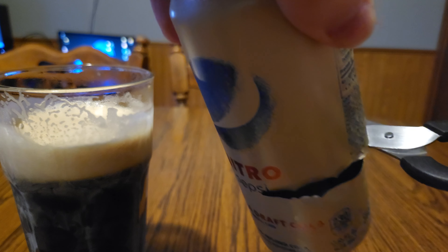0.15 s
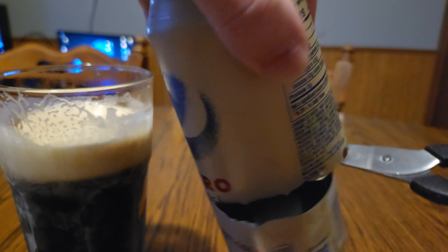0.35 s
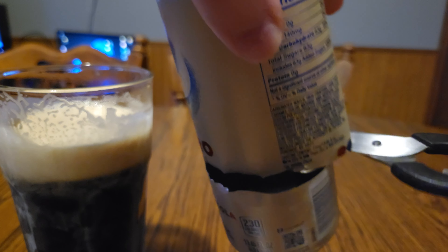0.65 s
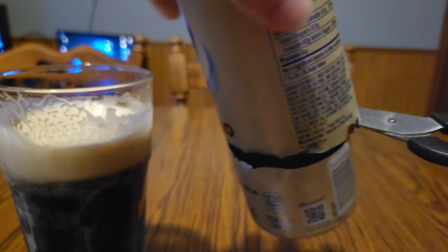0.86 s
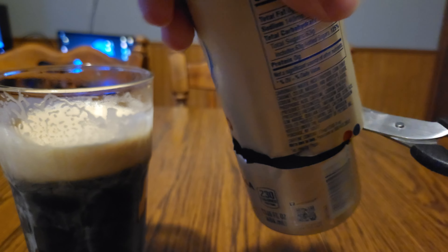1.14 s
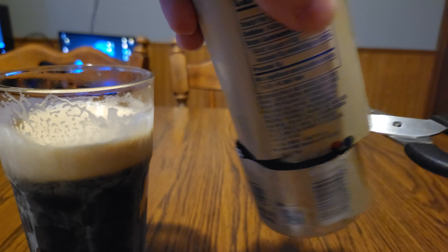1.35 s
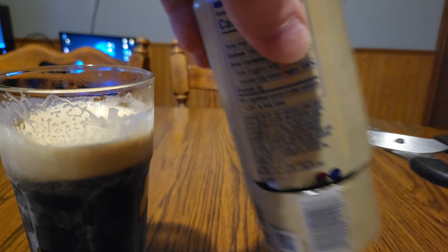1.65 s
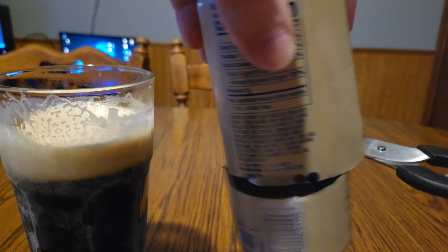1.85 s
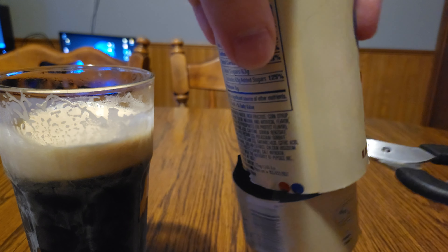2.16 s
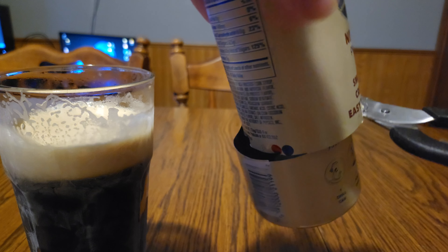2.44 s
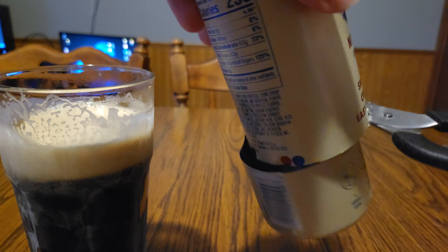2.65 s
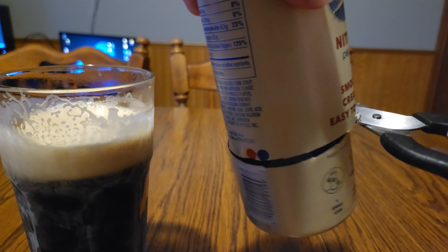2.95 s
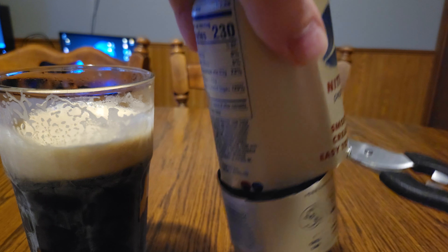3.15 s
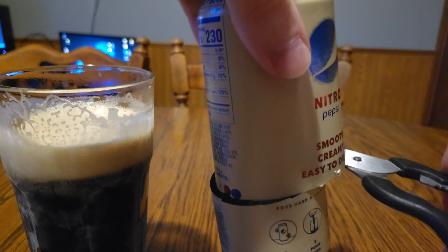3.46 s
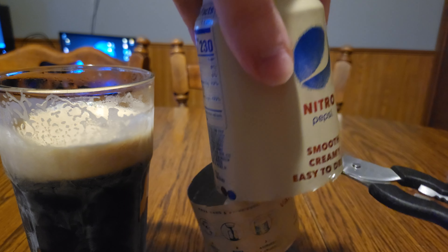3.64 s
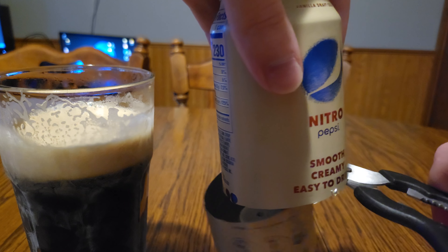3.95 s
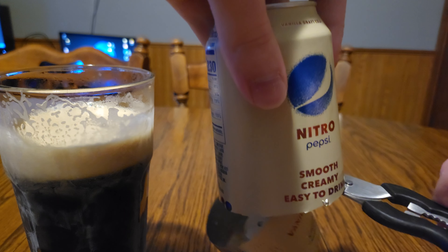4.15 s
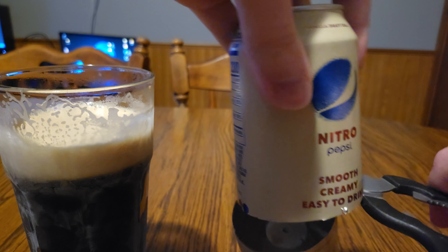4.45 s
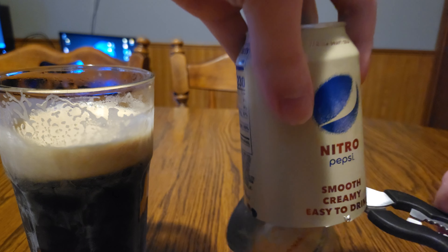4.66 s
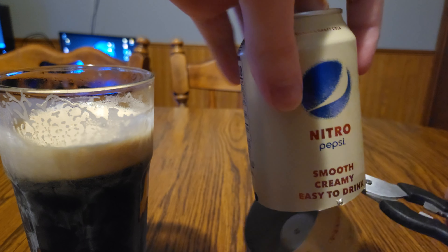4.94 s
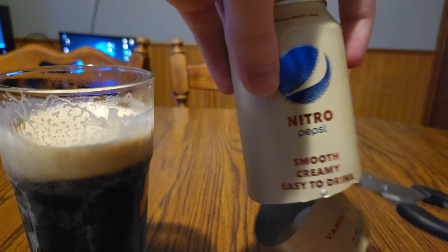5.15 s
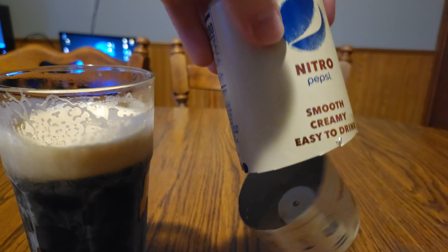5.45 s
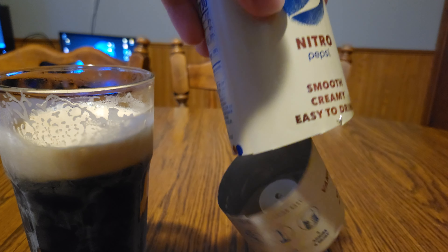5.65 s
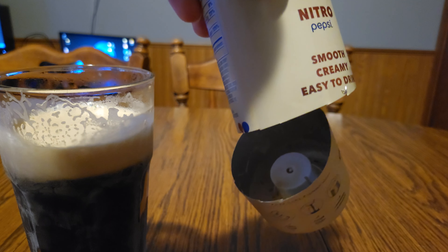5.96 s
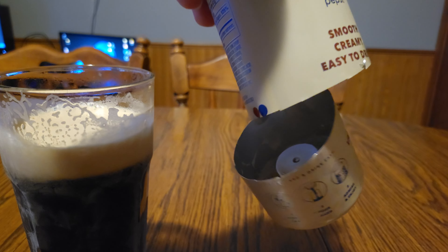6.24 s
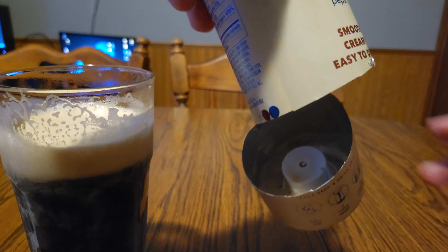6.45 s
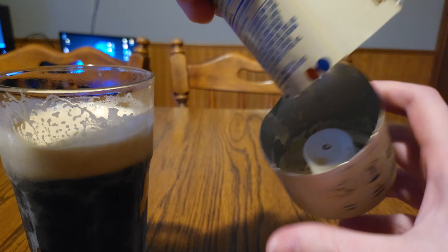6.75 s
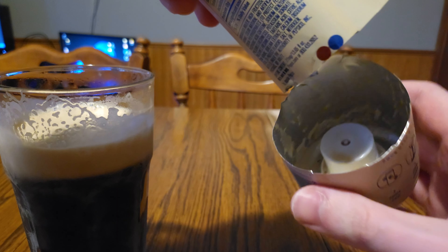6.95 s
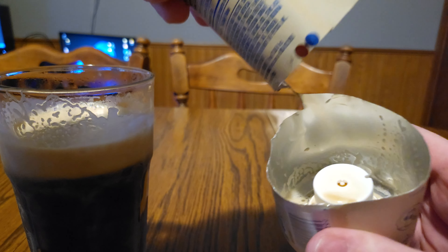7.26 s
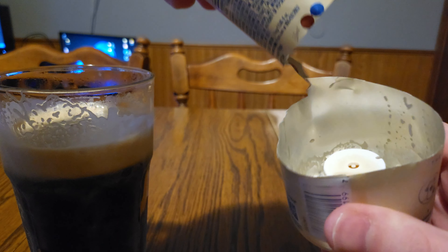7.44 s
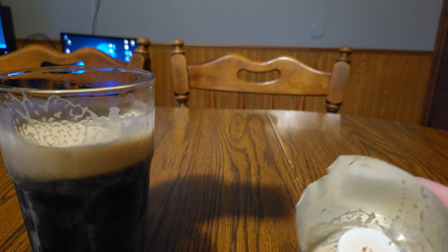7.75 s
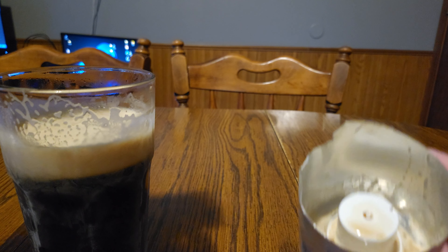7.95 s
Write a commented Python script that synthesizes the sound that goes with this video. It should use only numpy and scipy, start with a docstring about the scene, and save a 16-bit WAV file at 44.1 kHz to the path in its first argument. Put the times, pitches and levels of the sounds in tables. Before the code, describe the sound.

Close, dry metallic crunching and sharp tinny snaps of a drink can being cut, then a rattling knock on a table and a short ring.

```python
"""A small room, close to a wooden table: scissors work round a thin aluminium drink can held above it.
Noise bursts through resonances make the shearing crinkle and sharp snaps; the wall's note mostly rises.
Slip pulses make the creaks. The bottom drops on the table and rattles as struck modes over knocks,
hangs by a last strip, then is twisted off and rings as decaying sines.
Two microphone ports on one case hear it with a diffuse room tail, quiet air and a low hum."""
import sys
import numpy as np
from scipy import signal
from scipy.fft import rfft, irfft, next_fast_len
from scipy.io import wavfile
from scipy.ndimage import map_coordinates

SR = 44100
rng = np.random.default_rng(int(sys.argv[2]) if len(sys.argv) > 2 else 0)


def wav_record(signal):
    """Record a signal, one row per channel, as 16-bit PCM in the file named by sys.argv[1]."""
    frames = np.transpose(np.atleast_2d(signal))
    bounded = np.clip(frames, -1, 1)
    # unit amplitude maps onto the largest positive 16-bit level
    quanta = np.round(bounded * 32767).astype(np.int16)
    wavfile.write(sys.argv[1], SR, quanta)


N = 357192
TIME = np.arange(N) / SR   # seconds


def from_db(db):
    """Decibels to gain."""
    return 10 ** (np.asarray(db) / 20)


def rms_one(x):
    """Scale to unit power."""
    return x / np.sqrt(np.mean(x ** 2) + 1e-20)


def in_time(rows):
    """Each column of a curve at every sample."""
    s, *columns = np.transpose(rows)
    return [np.interp(TIME, s, column) for column in columns]


def at_hz(points, hz):
    """Read a table on a log-frequency axis."""
    table_hz, values = np.array(points)[:, 0], np.array(points)[:, 1]
    return np.interp(np.log(np.maximum(hz, 1)), np.log(table_hz), values)


def add(track, s, sound):
    """Mix a sound in at a time, trimming what falls outside the scene."""
    start = round(s * SR)
    at, sound = max(start, 0), sound[..., max(-start, 0):]
    track[..., at:at + sound.shape[-1]] += sound[..., :N - at]


def drift(per_s, size=32):
    """A smooth random wander of spread about 1."""
    knots, coarse = rng.standard_normal(400), TIME[::size]
    wander = map_coordinates(knots, [coarse * per_s], order=2, mode="mirror")
    return np.interp(TIME, coarse, wander)


def coloured(x, spectrum, size=4096):
    """Causal (minimum-phase) filter with this spectrum; white noise keeps its power."""
    log_gain = np.log(from_db(at_hz(spectrum, np.fft.rfftfreq(size, 1 / SR))))
    cepstrum = irfft(log_gain)
    cepstrum[1:size // 2] *= 2   # fold the cepstrum to make the filter causal
    cepstrum[size // 2 + 1:] = 0
    response = irfft(np.exp(rfft(cepstrum)))
    return signal.oaconvolve(x, response / np.linalg.norm(response))[:len(x)]


def resonance(x, hz, width_hz, size=256):
    """A two-pole resonance whose centre may move; white noise keeps its power."""
    r = np.exp(-np.pi * width_hz / SR)
    out, state = np.zeros(len(x)), np.zeros(2)
    centre, step = np.broadcast_to(hz, len(x)), size if np.ndim(hz) else len(x)
    for i in range(0, len(x), step):
        poles = [1, -2 * r * np.cos(2 * np.pi * centre[i] / SR), r * r]
        out[i:i + step], state = signal.lfilter([1, 0, -1], poles, x[i:i + step], zi=state)
    return out * np.sqrt((1 - r * r) / 2)


def ringing(modes):
    """One second of struck modes dying away, from rows of pitch_hz, level_db, t60_s."""
    t, out = TIME[:SR], 0
    for hz, db, t60 in modes:
        out = out + from_db(db - 60 * t / t60) * np.sin(2 * np.pi * hz * t)
    return out


def shiver(rise_s, fade_s, size=1024):
    """Bending waves race round the thin shell: a dense burst of a few ms with a nearly even spectrum."""
    t = TIME[:size]
    shape = (1 - np.exp(-(t / rise_s) ** 2)) * np.exp(-(t / fade_s) ** (3 / 2))
    phase = np.angle(rfft(rng.standard_normal(size) * shape))
    burst = irfft(np.exp(1j * phase)) * np.sqrt(shape)
    return burst * np.linalg.norm(shape) / np.linalg.norm(burst)


# Colour of the room air: pitch_hz, relative level_db (per Hz)
AIR = [(15, -50), (25, -36), (48, -15), (108, -8.5), (141, -12.5), (217, -5.5), (249, -12), (394, -12.5),
       (427, -14.5), (1020, -28), (1370, -25.5), (1700, -31.5), (16000, -69.5)]


def background(hum_hz=59.0, hum_db=-60.0, air_db=-57.0, side_db=-3.0):
    """Quiet room air as wide coloured noise, with the low hum of an appliance as a sine."""
    mid, side = (coloured(rng.standard_normal(N), AIR) for _ in range(2))
    air = from_db(air_db) * (mid + from_db(side_db) * side * np.array([[1], [-1]]))
    hum = from_db(hum_db) * np.sqrt(2) * np.sin(2 * np.pi * hum_hz * TIME)
    return air + hum * from_db([[-1.5], [1.5]])


# How long the room rings: pitch_hz, t60_s
ROOM_T60 = [(150, 0.69), (500, 0.41), (1400, 0.46), (3700, 0.43), (9700, 0.42), (16000, 0.28)]


def room(x, wet_db=-6.5, alike_hz=450, onset_s=.004, count=9):
    """A diffuse tail, nearly alike at both ports in the bass, that dies sooner in the treble."""
    t, response = TIME[:SR * 2 // 3], 0
    white = rfft(rng.standard_normal((3, len(t))))
    hz = np.fft.rfftfreq(len(t), 1 / SR)
    alike = 1 / (1 + (hz / alike_hz) ** 2)
    field = np.sqrt(alike) * white[2] + np.sqrt(1 - alike) * white[:2]
    edges = np.geomspace(40, SR / 2, count + 1)
    for low, high in zip(edges, edges[1:]):
        dying = np.exp(-np.log(1000) * t / at_hz(ROOM_T60, np.sqrt(low * high)))
        response = response + dying * irfft(field * (hz >= low) * (hz < high), len(t))
    # bounces from the table and the glass come first and strongest
    early = (1 - np.exp(-(t / onset_s) ** 2)) * (1 + 1.6 * np.exp(-t / .012))
    response = response * early
    response = from_db(wet_db) * response / np.linalg.norm(response, axis=1, keepdims=True)
    return signal.oaconvolve(x[None], response, axes=1)[:, :N]


# Phase between the microphone ports: pitch_hz, left_lead_rad
PORT_PHASE = [(100, 0.5), (800, 1.06), (1250, -2.5), (1900, -1.84), (2850, 3.5), (3450, -0.58), (5000, 4),
              (6500, -3), (8000, 0.5), (10000, 1.5), (12600, 2.2), (15000, -0.5)]
# Level between the microphone ports: pitch_hz, left_minus_right_db
PORT_BALANCE = [(120, 0.5), (330, 2.5), (650, 4.5), (1300, -3), (2600, 4.5), (5500, -2), (15000, 1.5)]


def microphones(x):
    """Two ports on one case: alike in the bass, their phases part in the treble."""
    size = next_fast_len(N + SR // 10)
    hz = np.fft.rfftfreq(size, 1 / SR)
    half = from_db(at_hz(PORT_BALANCE, hz) / 2) * np.exp(.5j * at_hz(PORT_PHASE, hz))
    return irfft(rfft(x, size) * [half, 1 / half], size)[:, :N]


# The whole can flexing in the grip: peak_s, half_length_s (to 1/e), level_db
THUDS = [(0.153, 0.11, -46), (0.616, 0.048, -51), (1.353, 0.046, -46), (1.374, 0.041, -52.5),
         (1.48, 0.034, -44.5), (2.237, 0.05, -40.5), (2.66, 0.026, -52.5), (3.416, .03, -43.5),
         (4.763, 0.015, -38.5), (5.646, 0.014, -37)]
# Colour of the flexing: pitch_hz, relative level_db (per Hz)
FLEX = [(40, -16), (110, -2.5), (200, 0.5), (400, -8.5), (600, -4.5), (1500, -40), (4000, -71)]


def flexing():
    """Dull rumbles of swelling noise as the weakened can gives under the fingers."""
    swell = sum(from_db(db) * np.exp(-((TIME - s) / length) ** 2) for s, length, db in THUDS)
    return swell * coloured(rng.standard_normal(N), FLEX)


# The bottom hits the table: start_s, level_db (before the ring and knock trims)
BOUNCES = [(5.627, -35), (6.2004, -25), (6.2015, -13.5), (6.216, -19), (6.2312, -15.5)]


def rattle(gap_s=0.01, first_db=-21.5, loss_db=1.2, count=8):
    """Uneven, ever weaker touches after the last bounce: start_s, level_db."""
    times = BOUNCES[-1][0] + np.cumsum(gap_s * rng.lognormal(0, .25, count))
    return [(s, first_db - loss_db * k) for k, s in enumerate(times)]


# Modes of the bottom against the wood: pitch_hz, level_db (before a small random change), t60_s
LANDED_MODES = [(269, -9, .3), (673, -7, .25), (770, -10, .25), (1240, -1, .15), (1303, -1, .15),
                (1448, -9, .3), (1680, -7, .2), (1787, -5, .25), (2035, -8, .28), (2400, -7, .2),
                (2745, -5, .3), (3015, -7, .2), (3450, -12, .22)]
# Colour of the knock on wood: pitch_hz, relative level_db (per Hz)
KNOCK = [(25, -35), (70, -1), (170, -8.5), (280, 0), (500, -1.5), (680, 2), (920, -8.5), (1300, 7.5),
         (1800, 1.5), (3000, -3.5), (4000, -12), (6300, -19), (12000, -46), (16000, -35)]


def landing(ring_db=-11.5, knock_db=5.5):
    """The cup-shaped bottom hits the wood and rattles to rest: noise knocks over ringing modes."""
    knocks, rings = np.zeros(N), np.zeros(N)
    for s, db in BOUNCES + rattle():
        modes = [(hz, level + rng.normal(0, 0.42), t60) for hz, level, t60 in LANDED_MODES]
        add(knocks, s, from_db(db + knock_db) * shiver(rise_s=0.00062, fade_s=0.0053))
        add(rings, s, from_db(db + ring_db) * ringing(modes))
    return coloured(knocks, KNOCK) + rings


# Modes of the bottom swinging free: pitch_hz, level_db (relative), t60_s
FREE_MODES = [(944.7, -5.5, 0.23), (956.4, -8, 0.34), (2710, -31, .25)]


def release(s=7.585, ring_db=-7.0, thump_db=-32.0):
    """The last strip parts: the freed cup rings and a puff of air gives a low thump."""
    out = np.zeros(N)
    add(out, s, from_db(ring_db) * ringing(FREE_MODES))
    add(out, s, from_db(thump_db) * ringing([(36, -3.0, 0.24), (67.4, 11.0, 0.049)]))
    return out


# Cut edges sticking and slipping: peak_s, rise_s, fall_s, pitch_hz, level_db, grit_db (relative)
CREAKS = [(.345, 0.0087, 0.019, 625, -20.5, -16.5), (.632, .027, 0.0075, 560, -18.5, -8),
          (1.191, 0.03, 0.035, 5550, -53.5, 2.5), (1.228, 0.03, .026, 494, -33, -33),
          (2.9, 0.015, 0.015, 1590, -38.5, -22), (3.375, 0.015, 0.022, 3480, -35.5, -4),
          (4.14, 0.042, 0.038, 864, -37.5, -13), (5.145, 0.012, 0.009, 1235, -22, -17.5),
          (5.147, 0.019, 0.0099, 960, -31, -23), (5.23, 0.045, 0.031, 1334, -45, -34),
          (5.4, 0.081, 0.094, 1360, -46, -34), (5.635, .005, 0.083, 3450, -48.5, -26),
          (5.999, .02, 0.024, 11040, -64, 2), (6.121, .04, 0.038, 11540, -64.5, 4.5),
          (7, 0.2, .18, 1310, -63, -17), (7.225, 0.0018, 0.003, 7970, -51.5, -9.5),
          (7.394, 0.0029, 0.0053, 1335, -26.5, -26.5), (7.52, 0.011, .03, 1410, -28.5, -15),
          (7.56, 0.021, 0.05, 1260, -29, 1), (7.573, 0.0044, 0.0066, 1350, -18, -9.5)]
# Colours of the sheet and of the bright cut edge: pitch_hz, relative level_db (per Hz)
SHEET = [(100, -54), (600, -9.5), (1000, -12), (1350, 1.5), (1700, -7.5), (2100, -8), (2600, -3.5),
         (3400, -6), (4300, -7), (5500, -14.5), (8000, -33.5), (16000, -50.5)]
TREBLE = [(500, -61), (3500, -20.5), (5000, -2.5), (6000, 1.5), (7500, 2), (9000, -5), (12000, -2),
          (15500, -7.5), (18000, -7)]


def creaks(slips_per_s=480, jitter=.25, width_hz=110, treble_db=-4.0):
    """Edge rubs on edge: uneven slips pump one resonance and shed bright grit."""
    out, grit, t = np.zeros(N), np.zeros(N), TIME[:SR // 2]
    lag = t - t.mean()
    for s, rise, fall, hz, db, grit_db in CREAKS:
        turns = np.cumsum(rng.lognormal(0, jitter, size=400)) / slips_per_s
        slips = np.zeros(len(t))
        slips[(turns[turns < t[-1]] * SR).astype(int)] = 1
        slips = signal.oaconvolve(slips, shiver(rise_s=0.000079, fade_s=0.003))[:len(t)]
        slips = rms_one(slips)
        swell = np.exp(-(lag / np.where(lag < 0, rise, fall)) ** 2) * np.hanning(len(t))
        swell = from_db(db) * swell
        tone = resonance(resonance(slips, hz, width_hz), hz, 6 * width_hz)
        add(out, s - t.mean(), swell * rms_one(tone))
        add(grit, s - t.mean(), swell * slips * from_db(grit_db))
    return out + coloured(grit, SHEET) + from_db(treble_db) * coloured(grit, TREBLE)


# Lowest note of the can wall as the cut goes round: time_s, pitch_hz (before the flex wander)
WALL_NOTE = [(0, 548), (.7, 616), (1.15, 574), (1.6, 638), (3.45, 658), (3.75, 794), (4.45, 839),
             (5.2, 935), (5.6, 794)]
# Colour of the can wall: pitch_hz, relative level_db (per Hz)
WALL = [(40, -50), (100, -12.5), (200, -12.5), (320, -6.5), (480, 1.5), (640, 3), (830, 0), (1000, -4),
        (1400, -17), (3000, -62.5), (8000, -84)]


def can_wall(boom, sheet, treble, note_db=-6.5, broad_db=5.0, note_width_hz=70, flex=0.012):
    """The can radiates through its wall note, the dense modes of the sheet and the bright cut edge."""
    note_hz = in_time(WALL_NOTE)[0] * np.exp(flex * drift(per_s=31))   # flexing bends the note
    note = from_db(note_db) * resonance(boom, note_hz, note_width_hz)
    wall = note + from_db(broad_db) * boom
    return coloured(wall, WALL) / 2 + coloured(sheet, SHEET) + coloured(treble, TREBLE)


def squeeze(lag, rise_s, fall_s, shape=1.45):
    """Effort that builds to its height at lag 0 and lets go; shape 1 is pointed, 2 is rounded."""
    return np.exp(-np.abs(lag / np.where(lag < 0, rise_s, fall_s)) ** shape)


# Bites of the blades: peak_s, rise_s, fall_s, crinkle_db, boom_db and fizz_db (both relative to crinkle)
# (levels before the shearing trims)
BITES = [(.025, .015, 0.012, -46, 6, -11), (0.114, 0.019, 0.022, -35.5, 9.5, -9.5),
         (.165, 0.027, 0.027, -20, 2, -11), (.325, .012, 0.053, -33, 2.5, -1),
         (.46, .01, 0.013, -33, 18, -27), (.62, .12, 0.02, -32.5, 3.5, -11.5),
         (0.798, .07, 0.073, -38.5, 2.5, -5), (1.08, .02, 0.0082, -51.5, 3.5, -10),
         (1.223, .02, 0.044, -41, 3.5, -15), (1.304, 0.038, 0.072, -37, 4.5, -11.5),
         (1.51, .035, 0.01, -34.5, 9, -6.5), (1.57, 0.012, 0.046, -35.5, 9, -10.5),
         (1.785, 0.086, 0.019, -33, 4.5, -7), (1.86, 0.031, 0.21, -55.5, 5.5, -9),
         (1.96, 0.032, 0.04, -32.5, 5, -5.5), (2.099, .012, 0.053, -34.5, 8.5, -12.5),
         (2.195, .01, .055, -36, 6, -5), (2.4, 0.035, 0.053, -53.5, 10, -7),
         (2.65, .035, 0.018, -56, 14.5, -16), (2.739, .008, 0.012, -40.5, 5.5, -14),
         (2.889, .05, 0.031, -43.5, 3.5, -13.5), (2.969, .02, 0.069, -51.5, 13, -15.5),
         (3.16, .04, 0.049, -44, -2.5, -11.5), (3.27, .025, 0.1, -42, 9, -15),
         (3.405, 0.025, .045, -28, 5, -14.5), (3.48, .03, 0.014, -27, 4, -4.5),
         (3.55, .04, 0.11, -40.5, 7.5, -5), (3.681, .03, 0.063, -36, -0.5, -9),
         (3.862, 0.018, .018, -27, 3.5, -18.5), (3.92, .02, 0.085, -48.5, 14, -10),
         (4.141, .04, 0.045, -40.5, 4.5, -7), (4.345, .008, 0.036, -46.5, -15, 5.5),
         (4.404, .022, 0.017, -34, 3, -20), (4.523, .008, 0.058, -43, 5.5, -29),
         (4.665, .022, 0.032, -36, 7, -12), (4.755, .04, 0.013, -29.5, -3.5, -11.5),
         (4.8, .015, 0.021, -44.5, -11, 3.5), (4.99, 0.012, 0.028, -42, 6, -5.5),
         (5.022, 0.008, 0.0078, -31, 9.5, -5), (5.14, .015, 0.021, -34.5, 1, -22),
         (5.262, .02, 0.036, -39, -7, -1.5), (5.371, .035, 0.018, -42.5, 6.5, -5.5),
         (5.635, .004, 0.078, -49.5, 5, -15), (5.81, .007, 0.038, -52, 0, -24.5)]
# The can turning in the hand between bites: crinkle, boom and fizz level_db (before the same trims)
GRIP_DB = [-70.5, -64, -79.5]


def effort(boom_lingers=1.134, handling_ends_s=6.1, size=4):
    """Strength of crinkle, boom and fizz: one squeeze per bite over the steady grip."""
    power = np.outer(from_db(GRIP_DB) ** 2, TIME < handling_ends_s)
    for s, rise, fall, db, boom, fizz in BITES:
        wall_fall = boom_lingers * fall   # the wall lets go more slowly than the blades
        lag = np.arange(-size * rise, size * wall_fall, 1 / SR)
        blades, wall = squeeze(lag, rise, fall), squeeze(lag, rise, wall_fall)
        strengths = np.array([blades, from_db(boom) * wall, from_db(fizz) * blades])
        add(power, s + lag[0], (from_db(db) * strengths) ** 2)
    return np.sqrt(power)


def crackle(per_s, spread_db):
    """Tiny fractures of uneven size at random moments; unit power."""
    sizes = from_db(spread_db * np.minimum(rng.exponential(1, N), 4)) * rng.choice([-1, 1], N)
    return rms_one(sizes * (rng.random(N) < per_s / SR))


def shearing(boom_db=-4.5, sheet_db=-0.5, treble_db=1.0, strip_db=-12.0, strip_width_hz=200,
             strip_ratio=3.2, strip_wander=0.052, clump_db=3.5, facet_db=0.0, facet_width_hz=190, count=14):
    """Clumps of tiny fractures each ring a facet of its own size; drives wall, sheet and edge."""
    crinkle, boom, fizz = effort()
    fractures = rms_one(crackle(per_s=430, spread_db=2.0) * from_db(clump_db * drift(per_s=44)))
    grains = rms_one(signal.oaconvolve(fractures, shiver(rise_s=0.0002, fade_s=0.0031))[:N])
    dealt = rng.integers(0, count, N)   # which facet each fracture rings
    pitches = np.geomspace(1100, 6000, count) * rng.lognormal(0, 0.093, count)
    facets = sum(resonance(fractures * (dealt == k), hz, facet_width_hz) for k, hz in enumerate(pitches))
    facets = rms_one(facets)
    # the strip beside the blades rings well above the wall note and wanders
    strip_hz = strip_ratio * in_time(WALL_NOTE)[0] * np.exp(strip_wander * drift(per_s=6))
    strip = from_db(strip_db) * resonance(grains, strip_hz, strip_width_hz)
    sheet = grains / 2 + from_db(facet_db) * facets / 2 + strip
    return from_db([[boom_db], [sheet_db], [treble_db]]) * [boom * grains, crinkle * sheet, fizz * grains]


def cluster(spread_s=.008, lesser_db=-16.0, count=4):
    """One main break sets off a few lesser ones just after it."""
    breaks = np.zeros(SR // 30)
    delays = np.minimum(rng.exponential(spread_s * SR, count), len(breaks) - 1).astype(int)
    breaks[delays] = from_db(lesser_db) * rng.standard_normal(count)
    breaks[0] = 1
    return breaks


# The sheet buckles: start_s, level_db, boom_db and treble_db (both relative), pitch_hz of the patch
# (levels before the trims of the function)
SNAPS = [(0.023, -39.5, -0.5, -6.5, 1520), (0.0996, -30, -6.5, -19, 1450), (0.1245, -13, -0.5, -22, 1070),
         (.1441, -20.5, -9.5, -10, 1090), (0.1731, -12, -8, -10, 1900), (0.1917, -23, -3.5, -29, 1800),
         (0.3191, -17, -7, -17.5, 1150), (0.3766, -22, 2, -1, 1310), (0.3961, -32, 15.5, -5, 1086),
         (0.4478, -9.5, -0.5, -8, 1800), (.5182, -17.5, 2, -27.5, 1310), (0.5522, -21, -12, -9, 1110),
         (.6295, -11.5, -6.5, -18.5, 2330), (.7961, -25, 9.5, -25, 1320), (0.828, -29, 2, -18, 1334),
         (1.2965, -25.5, 13.5, -14.5, 1600), (1.3099, -23, 7, -16, 1830), (1.3513, -28.5, 6, -20.5, 1140),
         (1.3942, -28.5, 12, -20, 1380), (1.4571, -27.5, 3, -18.5, 1990), (1.4987, -9.5, 2, -14.5, 1080),
         (1.5395, -4, 3.5, -20.5, 1890), (1.5474, -7.5, -3.5, -22, 1174), (1.5696, -28.5, -24.5, 0, 1310),
         (1.6043, -26, -18, -12, 1520), (1.6851, -25.5, -25.5, -10.5, 1333), (1.729, -14.5, 4.5, -16, 1310),
         (1.7759, -12, 3, -17.5, 1385), (1.9545, -12, 3, -20.5, 1100), (1.9722, -16.5, -7, -13, 1113),
         (2.0717, -24, -3.5, -15, 1900), (2.0832, -16, -1.5, -11, 1900), (2.0956, -12.5, -1.5, -14.5, 1424),
         (2.1703, -5, 0, -17.5, 1450), (2.2454, -18.5, -4, -20.5, 1440), (2.3837, -22, -8.5, -22.5, 1970),
         (2.4428, -35, -0.5, -5, 1350), (2.5753, -34, -16, -16, 1760), (2.617, -28.5, -20, -13, 2534),
         (2.6424, -26.5, 0.5, -15, 3060), (2.7306, -30, 4, -8, 1367), (2.7918, -36, -8.5, -11.5, 1760),
         (2.9597, -29, 8, -20.5, 1340), (3.1672, -33.5, -17.5, -9, 1560), (3.1926, -20, -17, -19.5, 5400),
         (3.2176, -15.5, -5, -19.5, 1064), (3.242, -6, -7, -15, 2987), (3.2974, -22, 4, -14, 2518),
         (3.3318, -26.5, 9.5, -8.5, 2430), (3.3912, -9.5, -3, -8, 1923), (3.3972, -13, -15, -9.5, 1305),
         (3.5299, -15.5, -6, -26, 1500), (3.6504, -11.5, -16.5, -12, 3400), (3.6556, -10.5, -18, -27, 2625),
         (3.8534, -16, -4.5, -1.5, 2640), (3.8933, -6, -2, -10, 2530), (3.8998, -12, -12, -13.5, 2735),
         (4.0265, -27.5, -22, -27.5, 1370), (4.1365, -33.5, -13, -27, 2440),
         (4.2057, -33, -18, -12.5, 1470), (4.235, -31, -23, -20, 2220), (4.3357, -32, -15, -10, 2550),
         (4.4062, -22.5, -11.5, -9, 1535), (4.5255, -28, 4, -8.5, 1170), (4.6289, -32, -23, -3, 1360),
         (4.7157, -19.5, -4.5, -19.5, 2380), (4.7462, -12.5, 3, -17, 2090), (4.76, -14, -20, -19, 2260),
         (4.854, -30, -18, -7.5, 1256), (5.0145, -19.5, 0, -8.5, 3255), (5.0204, -20.5, -5, -4.5, 1290),
         (5.329, -26.5, 2.5, -19, 3020), (5.3857, -28.5, -2, -18.5, 1390),
         (5.6226, -26, -13.5, -10.5, 3270), (5.805, -36, -5.5, -19, 2360),
         (6.2029, -27.5, -8.5, 1.5, 12000), (6.9183, -45, -15.5, -17.5, 1310),
         (7.3185, -9, -8.5, -10.5, 1480), (7.5804, -6.5, -38.5, -10.5, 1270)]


def snaps(boom_db=-6.0, sheet_db=-4.5, treble_db=5.0, patch_db=-6.5, patch_width_hz=420):
    """Each buckle sets the shell shivering and rings one patch of it; drives wall, sheet and edge."""
    drive, share = np.zeros((3, N)), from_db(patch_db)
    for s, db, boom, treble, hz in SNAPS:
        burst = signal.fftconvolve(cluster(), shiver(rise_s=0.00086, fade_s=0.004))
        # the wave returns from the rim and ripples the spectrum
        rim_echo = np.roll(burst, rng.integers(SR // 1500, SR // 600))
        rippled = .9 * burst + .4 * rng.choice([-1, 1]) * rim_echo
        patch = resonance(rippled, hz, patch_width_hz)
        sheet = (rippled + share * patch) / np.hypot(1, share)
        burr = resonance(rippled, rng.uniform(6000, 14500), 2200)   # each burr of the edge has its own ping
        edge = (rippled + from_db(-2.5) * burr) / np.hypot(1, from_db(-4.5))
        gains = from_db(db + np.array([[boom + boom_db], [sheet_db], [treble + treble_db]]))
        add(drive, s, gains * [burst, sheet, edge])
    return drive


def can_face():
    """The sound of one face of the can; every face shivers in its own way."""
    return can_wall(*(snaps() + shearing())) + creaks() + flexing() + landing()


# Place of the can, which drifts to the right and partly back: time_s, left_minus_right_db
PAN = [(0, 0), (5.3, 0), (5.6, -1.5), (6.5, -2.5), (7.2, -1)]


def scene(left_db=-3.5, right_db=-3.5, flank_db=-5.5):
    """The front of the can faces both microphones; its flanks push them in opposite senses."""
    opposite = np.array([[1], [-1]])
    front, flank = can_face() + release(), from_db(flank_db) * can_face()
    direct = microphones(front) + microphones(flank) * opposite
    place = from_db(np.array([[left_db], [right_db]]) + in_time(PAN)[0] / 2 * opposite)
    return (direct + room(front) + room(flank)) * place + background()


def record(dry, cutoff_hz=16200):
    """The top of the treble is cut steeply by an elliptic low-pass."""
    return signal.sosfilt(signal.ellip(10, .1, 80, cutoff_hz, fs=SR, output="sos"), dry)


dry = scene()
out = record(dry)
wav_record(out)
```